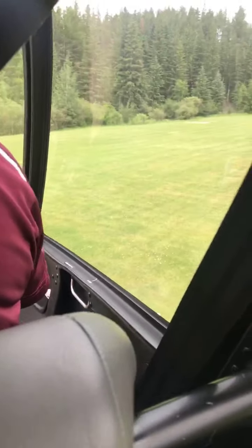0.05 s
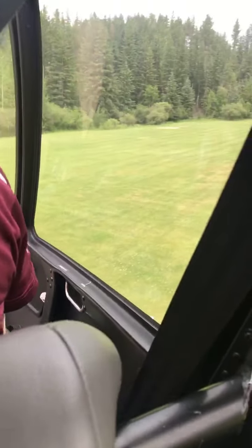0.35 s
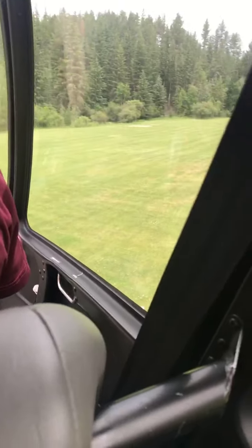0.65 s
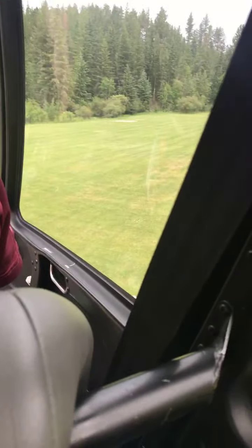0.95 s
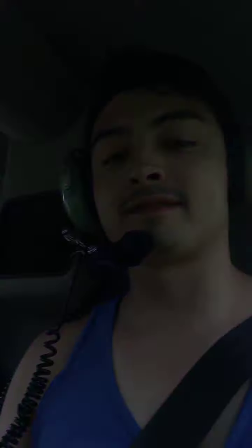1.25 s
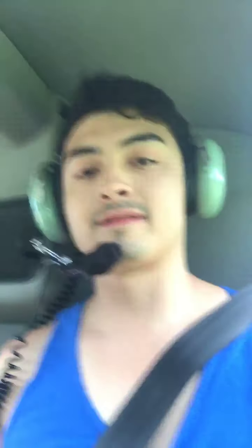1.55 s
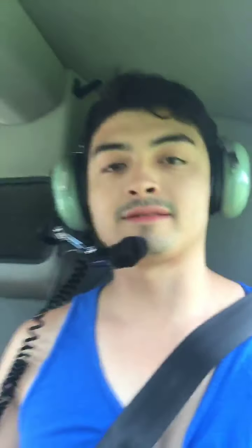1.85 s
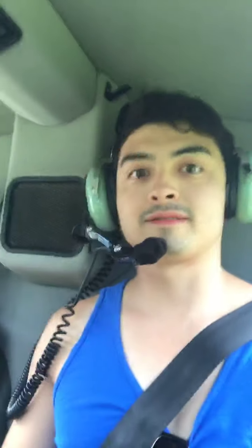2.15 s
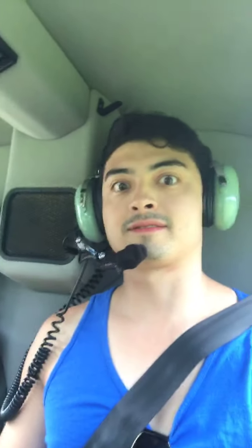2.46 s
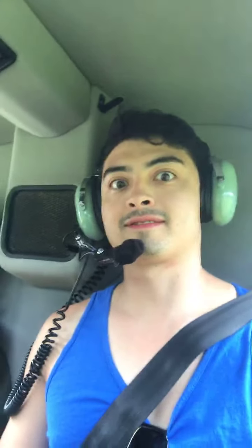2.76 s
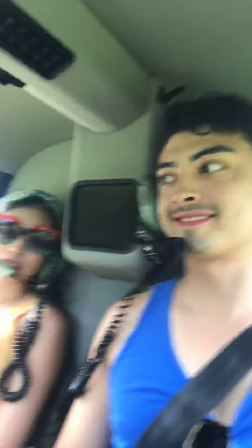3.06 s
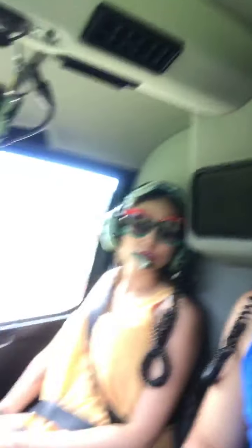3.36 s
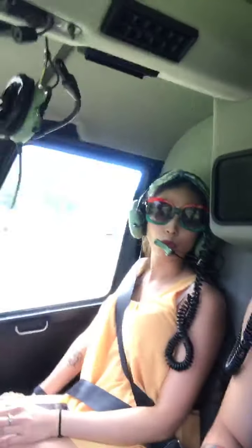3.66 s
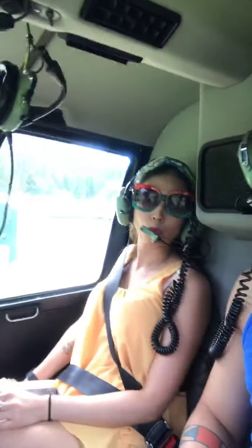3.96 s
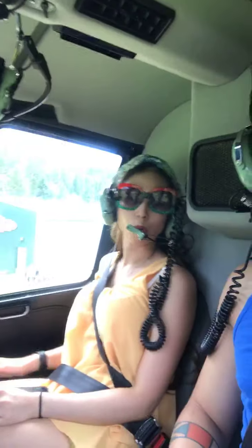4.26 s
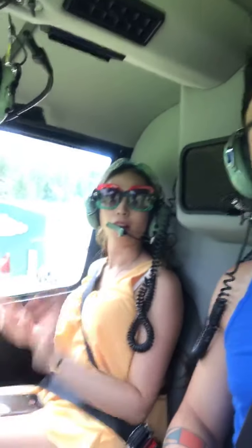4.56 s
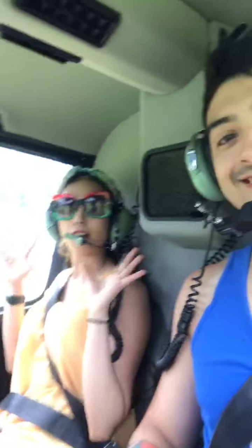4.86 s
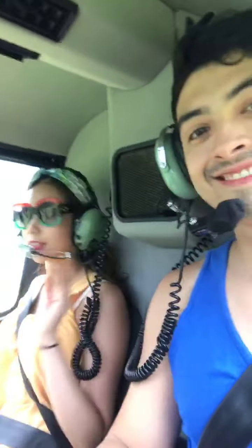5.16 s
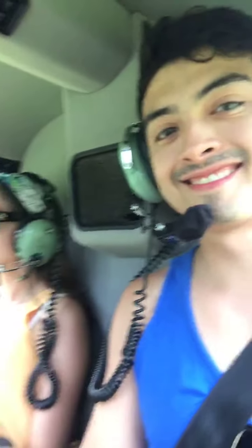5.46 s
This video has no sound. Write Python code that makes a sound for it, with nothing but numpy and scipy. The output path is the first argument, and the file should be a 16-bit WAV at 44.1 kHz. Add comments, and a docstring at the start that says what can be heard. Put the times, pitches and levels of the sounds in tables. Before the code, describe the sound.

Steady helicopter drone and chopping roar heard from inside, broken near the start by short dropouts and an electrical click.

```python
"""A six-cylinder drone fills a small piston helicopter, with gearbox whine and deep rotor rumble.
A phone pointed at the side window drops out twice, then falls silent and switches with a crackle
to its other microphone, which hears less rumble and whine and more of the cabin's hollow roar.
The blades chop this roar, which swells and eases as the phone swings across the rear seats;
on some blade beats a loose panel knocks and rings in its resonances."""
import sys
import numpy as np
from scipy import signal
from scipy.fft import rfft, irfft
from scipy.io import wavfile

SR = 44100
rng = np.random.default_rng(int(sys.argv[2]) if len(sys.argv) > 2 else 0)


def generate_wav(signal):
    """Clip the signal to [-1, 1] and save it as 16-bit WAV at the path in sys.argv[1]."""
    frames = np.transpose(np.atleast_2d(signal))
    scaled = np.clip(frames, -1, 1) * 32767
    pcm = np.round(scaled).astype(np.int16)
    wavfile.write(sys.argv[1], SR, pcm)


N = 251370
TIME, FREQUENCIES = np.arange(N) / SR, np.fft.rfftfreq(N, 1 / SR)

# stretches in which the phone takes in sound: start t/s, end t/s
LIVE = [(0, .76), (.804, .9435), (1.146, 1.2725), (1.4895, 6)]
SWITCH_S = 1.4  # the microphone changes during the last silence
CABIN_ON_S, OVERSHOOT_S = LIVE[-1][0], .025
CYLINDERS = 6


def exhaust(firings, blades):
    """Periodic firing makes the drone; the blades modulate its amplitude slightly."""
    cabin_db = -17 - 3 * (1 - rise(2.25, over_s=.22))  # starts low at the second microphone
    overshoot_db = 8.5 * settle(CABIN_ON_S, OVERSHOOT_S)
    level_db = np.where(TIME < SWITCH_S, -17.5, cabin_db + overshoot_db)
    return from_db(level_db) * tone(firings, waver_db=.44, smear_rad=.041) * throb(blades, depth_db=.75)


def window_side(firings, blades):
    """Rotation makes line spectra: engine, rotor and gear tones stand over rumble, roar and hiss."""
    # lines: multiple of the four-stroke cycle rate (engine) or blade rate (rotor), level/dB
    engine_orders = [(2, -32.5), (7, -37.5), (10, -43), (11, -38.5), (12, -36.5), (14, -43.5), (15, -45),
                     (17, -44.5), (24, -54), (26, -48), (31, -52), (40, -52), (48, -42), (50, -52.5),
                     (54, -52), (65, -58.5)]
    rotor_orders = [(3, -28), (4, -36.5), (5, -40.5), (6, -27.5)]
    # noise spectra: f/Hz, relative level/dB
    rumble_spectrum = [(20, -21.5), (30, -11.5), (41, 10.5), (60, -12.5), (90, 3.5), (130, -8.5),
                       (190, -10.5), (300, -34.5)]
    roar_spectrum = [(150, -7.5), (250, 0.5), (340, -1), (400, -1), (490, -13), (620, -7), (900, -9),
                     (1200, -12.5), (1400, -14.5), (1800, -17.5), (2300, -24.5), (2800, -34.5)]
    hiss_spectrum = [(1800, -16.5), (2600, 0), (3400, 2.5), (4200, -3), (4900, -9), (5500, -6.5),
                     (7500, -11.5), (10300, -18), (12500, -14.5), (15500, -20)]
    cycles = firings / CYLINDERS
    engine = harmonics(cycles, engine_orders, waver_db=1.4, smear_rad=.27)
    rotor = harmonics(blades, rotor_orders, waver_db=4.5, smear_rad=.5)
    whine = gearbox(cycles)
    rumble = from_db(-28.5) * noise(rumble_spectrum)
    roar = from_db(-32.5) * noise(roar_spectrum) * throb(firings, depth_db=1)
    hiss = from_db(-50.5) * noise(hiss_spectrum) * throb(firings, depth_db=.5)
    return engine + rotor + whine + rumble + roar + hiss


def cabin_side(firings, blades):
    """Amplitude modulation: blades chop the noise above the rumble; firings pulse the boom and roar."""
    # lines: multiple of the four-stroke cycle rate (engine) or blade rate (rotor), level/dB
    engine_orders = [(2, -41.5), (4, -38.5), (7, -38.5), (9, -42), (10, -42), (11, -43), (12, -46),
                     (14, -44.5), (17, -41.5), (24, -53.5), (48, -53), (78, -63.5)]
    rotor_orders = [(3, -46.5), (4, -38.5), (5, -48.5), (6, -40)]
    # noise spectra: f/Hz, relative level/dB
    rumble_spectrum = [(22, -32), (36, -10), (48, 4.5), (100, -3.5), (150, -2), (190, -3.5), (300, -37.5)]
    boom_spectrum = [(150, -14.5), (220, -2.5), (330, 2.5), (410, -1), (460, -4.5), (520, -13)]
    roar_spectrum = [(470, -10.5), (540, -5.5), (600, 2), (700, 0), (820, -5.5), (990, -9.5), (1050, -15),
                     (1160, -14.5), (1270, -30.5), (2000, -48)]
    rasp_spectrum = [(1000, -11), (1300, -5), (1550, 1.5), (1780, -0.5), (2050, -5), (2520, -6.5),
                     (2760, -20), (3500, -37)]
    hiss_spectrum = [(2000, -11.5), (2800, -0.5), (3300, -3), (4200, -2), (4900, -5), (5400, -3.5),
                     (6000, -1), (7400, -7), (8100, -6.5), (10300, -15.5), (11800, -13.5), (15500, -18)]
    rumble_db, boom_db, roar_db, rasp_db, hiss_db = cabin_levels()
    engine = harmonics(firings / CYLINDERS, engine_orders, waver_db=2, smear_rad=.44)
    rotor = harmonics(blades, rotor_orders, waver_db=.5, smear_rad=.41)
    rumble = from_db(rumble_db) * noise(rumble_spectrum)
    boom = from_db(boom_db + 1.2 * drift(19)) * noise(boom_spectrum)
    roar = from_db(roar_db + .48 * drift(28)) * noise(roar_spectrum, ripple_db=1.5)
    rasp = from_db(rasp_db + 1.3 * drift(18)) * noise(rasp_spectrum, ripple_db=2.54)
    hiss = from_db(hiss_db + 1.1 * drift(25)) * flutter(noise(hiss_spectrum, ripple_db=2))
    lagging = blades - .3  # boom and roar peak after the blade beat
    body = boom * throb(lagging, depth_db=.5) + roar * throb(lagging, depth_db=3)
    treble = rasp * throb(blades, depth_db=1.5) + hiss * throb(blades, depth_db=1)
    return engine + rotor + rumble + body * throb(firings, depth_db=1.5) + treble


def cabin_levels(opens_s=1.66):
    """The sound field varies with position: each band's level/dB swells as the phone swings through."""
    rumble = -34 + swing(swell_db=4, nearest_s=3.05, width_s=.45)
    boom = -32.5 + swing(swell_db=5.5, nearest_s=2.72, width_s=.81)
    roar = -33.5 + swing(swell_db=4, nearest_s=2.6, width_s=1.12)
    rasp = -46.9 + swing(swell_db=2.8, nearest_s=2.77, width_s=.69)
    hiss = -59 + swing(swell_db=2.5, nearest_s=3.12, width_s=.85)
    # the second microphone starts boomy and muffled, then opens with a surge of roar
    boom += 5 * settle(CABIN_ON_S, over_s=.33)
    muffled = 1 - rise(opens_s, over_s=.008) - settle(CABIN_ON_S, OVERSHOOT_S)
    roar += 5 * settle(opens_s, over_s=.079)
    return rumble, boom, roar - 3.5 * muffled, rasp - 3.5 * muffled, hiss - 8 * muffled


def gearbox(cycles, mesh_order=51.1):
    """Meshing teeth whine at a fixed, non-integer multiple of the engine's cycle rate."""
    return from_db(-43) * tone(mesh_order * cycles, waver_db=5, smear_rad=.2)


def panel_knocks(blades, width_s=.005):
    """Forced vibration: noise bursts drive a loose panel's modes, lightly on every blade beat."""
    # knocks on the hardest beats: t/s, relative level/dB
    knocks = [(2.363, -38.5), (2.4468, -37), (2.59, -33), (3.4052, -38), (3.4815, -32.5), (4.7152, -39),
              (5.0105, -32.5), (5.2564, -31), (5.624, -35)]
    # panel resonances: f/Hz, relative level/dB, T60/s
    modes = [(1436, -0.5, 0.01), (1612, 1, 0.024), (1830, -3, .012)]
    shudder = sum(from_db(db) * np.exp(-((TIME - s - width_s / 2) / width_s) ** 2) for s, db in knocks)
    beat = np.round(blades - np.floor(blades[0])).astype(int)
    strength = from_db(-46 + 3 * rng.standard_normal(beat[-1] + 1))
    rattle = strength[beat] * np.cos(np.pi * blades) ** 24
    force = (shudder + rattle) * noise([(1200, -9), (1450, 7), (1850, -2.5), (2300, -9.5)])
    ringing = sum((-1) ** k * from_db(db) * ring(force, hz, t60) for k, (hz, db, t60) in enumerate(modes))
    return from_db(-34) * ringing


def intake(fade_s=.00017):
    """Gating: sound cuts in abruptly and dies within an instant at each dropout."""
    return sum((TIME >= start) * np.clip((end - TIME) / fade_s, 0, 1) for start, end in LIVE)


def switch_crackle(click_hz=5050, click_s=.00015, fizz_s=.00078):
    """Brief transients are broadband: electrical clicks with a thump and a fizz, then faint static."""
    # clicks: t/s, click level/dB, thump level/dB
    clicks = [(1.4317, -23.5, -65), (1.443, -17.5, -39), (1.456, -30, -45), (1.4663, -4.5, -14)]
    # bright edge of every click: f/Hz, relative level/dB, decay time/s
    edge_partials = [(8700, -11, 0.0002), (13300, -5, .00016)]
    sharp, thumps, fizz = np.zeros((3, N))
    for s, db, thump_db in clicks:
        near = np.abs(TIME - s) < .05
        age = TIME[near] - s
        body = np.exp(-np.abs(age) / click_s) * np.cos(2 * np.pi * click_hz * age)
        edge = sum(from_db(edge_db) * np.exp(-np.abs(age) / edge_s) * np.sin(2 * np.pi * hz * age)
                   for hz, edge_db, edge_s in edge_partials)
        sharp[near] += from_db(db) * (body + edge)
        fizz[near] += from_db(db - 10) * np.exp(-np.abs(age) / fizz_s)
        thumps[round(s * SR)] = from_db(thump_db)
    static = from_db(-40.5) * (TIME > clicks[-2][0]) * (TIME < CABIN_ON_S)
    static *= noise([(150, 24), (1200, 3), (2500, -9), (5200, 0), (8200, -8), (12000, -23)])
    fizz *= noise([(700, -1), (1500, -3), (2900, -8), (4400, -2), (5600, 2), (9000, -15), (15000, -25)])
    return sharp + ring(thumps, hz=262, t60=.011) + static + fizz


def dropout_snaps():
    """An impulse response: an electrical snap rings as sound returns from the two longer silences."""
    impulses = np.zeros(N)
    impulses[[round(start * SR) for start, end in LIVE[2:]]] = from_db(-15.5)
    return ring(impulses, hz=1950, t60=.003)


def chirp(at_s=1.8215, start_hz=11800, end_hz=3105, glide_s=.0008, swell_s=.0031):
    """A fast exponential glide in frequency is heard as a tiny tick with a short ring."""
    age = np.maximum(TIME - at_s, 0)
    hz = end_hz + (start_hz - end_hz) * np.exp(-age / glide_s)
    swell = (age / swell_s * np.exp(1 - age / swell_s)) ** 2
    return from_db(-21.5) * swell * np.sin(2 * np.pi * np.cumsum(hz) / SR)


def noise_floor():
    """Masking hides this faint low noise except in the silences."""
    return from_db(-68) * noise([(6, 3), (40, -31.5), (150, -46.5), (600, -59.5)])


def tone(turns, waver_db, smear_rad):
    """Random amplitude and phase modulation broaden a line locked to a shaft."""
    angle = 2 * np.pi * (turns + rng.random()) + smear_rad * drift(14)
    return np.sqrt(2) * np.sin(angle) * from_db(waver_db * drift(5.3))


def harmonics(turns, orders, waver_db, smear_rad):
    """A harmonic series: whole multiples of one rotation rate."""
    return sum(from_db(db) * tone(k * turns, waver_db, smear_rad) for k, db in orders)


def throb(turns, depth_db):
    """Periodic amplitude modulation that peaks once a turn; rms 1."""
    return rms_one(from_db(depth_db * np.cos(np.pi * turns) ** 4))


def ring(force, hz, t60):
    """A damped resonator: a unit impulse starts a decaying sine of height 1."""
    decay, step_rad = from_db(-60 / (t60 * SR)), 2 * np.pi * hz / SR
    return signal.lfilter([0, np.sin(step_rad)], [1, -2 * decay * np.cos(step_rad), decay ** 2],
                          force + 1e-18)


def noise(spectrum, ripple_db=0):
    """Spectral shaping of white noise by (f/Hz, level/dB), rippled by close cabin resonances; rms 1."""
    hz, db = np.transpose(spectrum)
    octave, points = np.log2(FREQUENCIES + 1), np.log2(hz)
    octaves_outside = np.abs(octave - np.clip(octave, points[0], points[-1]))
    ripple = ripple_db * np.interp(FREQUENCIES, np.geomspace(100, 16000, 500), rng.standard_normal(500))
    gain = from_db(np.interp(octave, points, db) + ripple - 30 * octaves_outside)
    return rms_one(irfft(rfft(rng.standard_normal(N)) * gain, N))


def flutter(x, depth_db=2, rate_hz=20, count=12):
    """Uncorrelated modulation: each treble band wavers on its own; rms 1."""
    spectrum, centres = rfft(x), np.geomspace(2800, 14000, count)
    bands = (irfft(spectrum * np.interp(FREQUENCIES, centres, row), N) for row in np.eye(count))
    return rms_one(sum(band * from_db(depth_db * drift(rate_hz)) for band in bands))


def drift(rate_hz):
    """Low-pass filtering turns noise into a slow fluctuation; rms 1."""
    return rms_one(irfft(rfft(rng.standard_normal(N)) / (1 + (FREQUENCIES / rate_hz) ** 2), N))


def swing(swell_db, nearest_s, width_s):
    """A Gaussian swell in level/dB as the phone passes the place where a sound is strongest."""
    return swell_db * np.exp(-((TIME - nearest_s) / width_s) ** 2)


def rise(at_s, over_s):
    """A sigmoid step from 0 to 1."""
    return .5 + .5 * np.tanh((TIME - at_s) / over_s)


def settle(from_s, over_s):
    """Exponential relaxation after a jump to 1."""
    return (TIME >= from_s) * np.exp(-np.abs(TIME - from_s) / over_s)


def from_db(db):
    """Level/dB to amplitude ratio."""
    return 10 ** (np.asarray(db) / 20)


def rms_one(x):
    """Normalisation to unit rms."""
    return x / np.sqrt(np.mean(x ** 2) + 1e-20)


def scene():
    """Fixed gearing locks the rotor to the engine; the phone drops out and changes microphone."""
    # engine speed: t/s, firing f/Hz
    speed = [(0, 136.1), (1.3, 136.7), (1.95, 137.4), (2.8, 136.45), (3.45, 136.5), (4.2, 135.4),
             (5.7, 135.9)]
    blades_per_firing, blade_overhead_s = .09915, 3.482
    # phases, as running counts of firings and blade passages
    firings = np.cumsum(np.interp(TIME, *np.transpose(speed))) / SR
    blades = blades_per_firing * (firings - np.interp(blade_overhead_s, TIME, firings))
    drone = exhaust(firings, blades)
    window = window_side(firings, blades)
    cabin = cabin_side(firings, blades) + panel_knocks(blades)
    helicopter = drone + np.where(TIME < SWITCH_S, window, cabin)
    return (intake() * helicopter + noise_floor() + dropout_snaps() + switch_crackle() + chirp())[None]


def record(dry):
    """Band limiting: an elliptic low-pass filter cuts the top steeply."""
    cutoff_hz = 15800
    return signal.sosfilt(signal.ellip(10, .1, 90, cutoff_hz, fs=SR, output="sos"), dry)


dry = scene()
out = record(dry)
generate_wav(out)
```